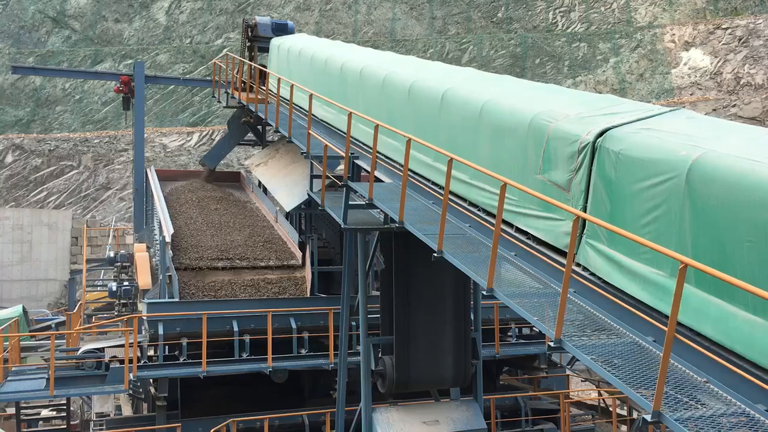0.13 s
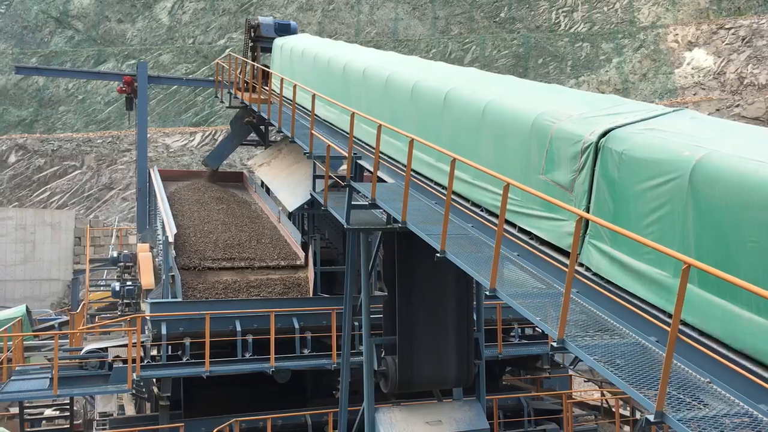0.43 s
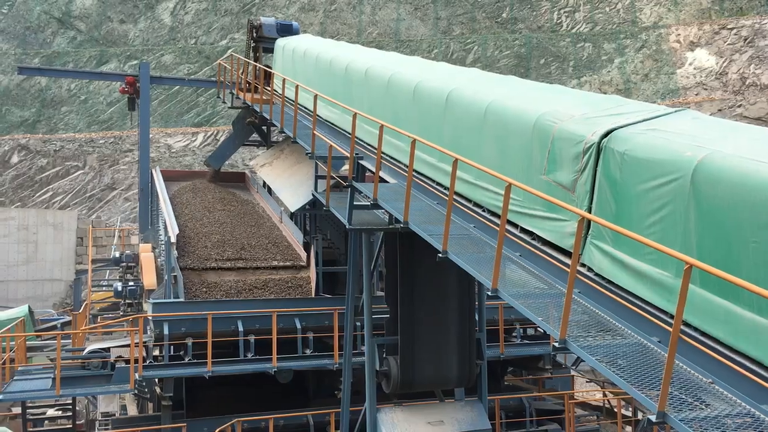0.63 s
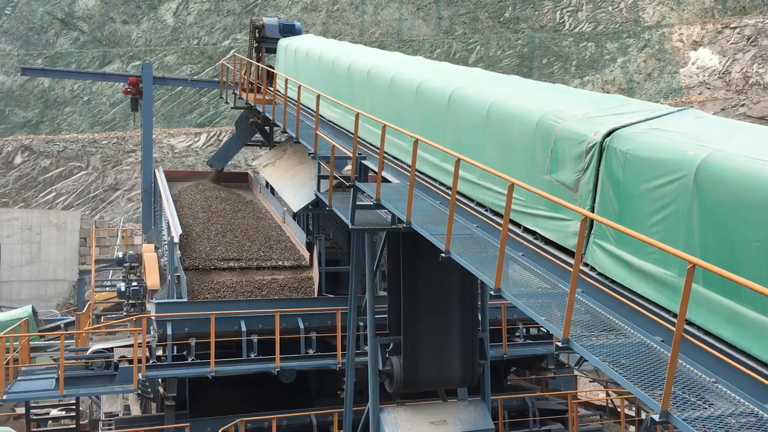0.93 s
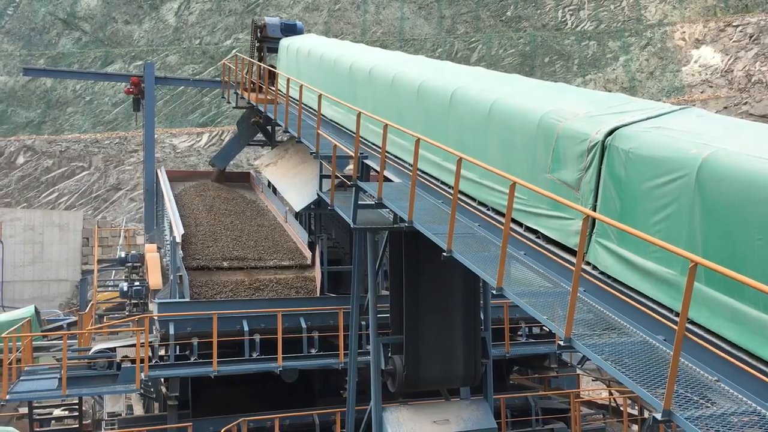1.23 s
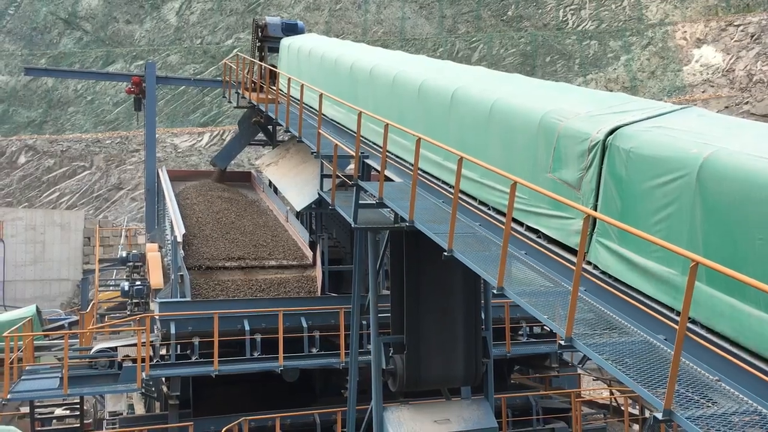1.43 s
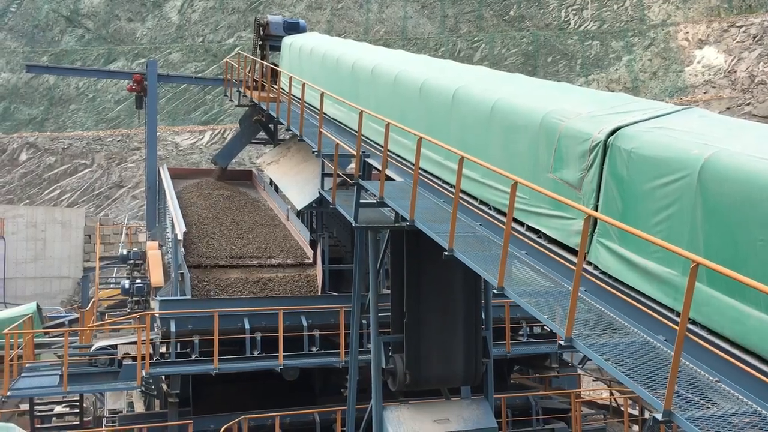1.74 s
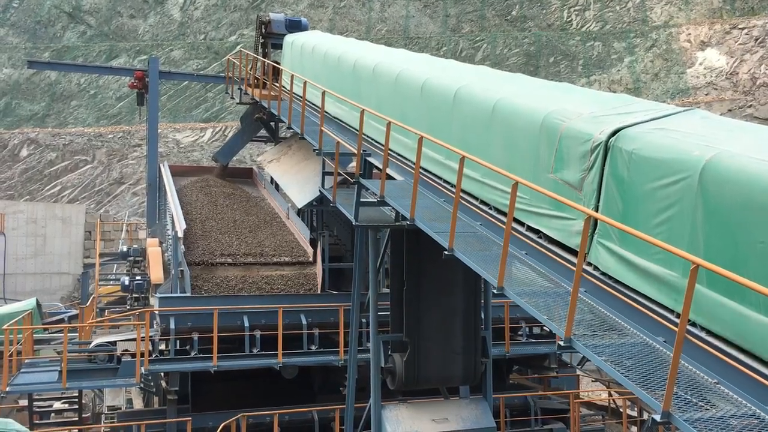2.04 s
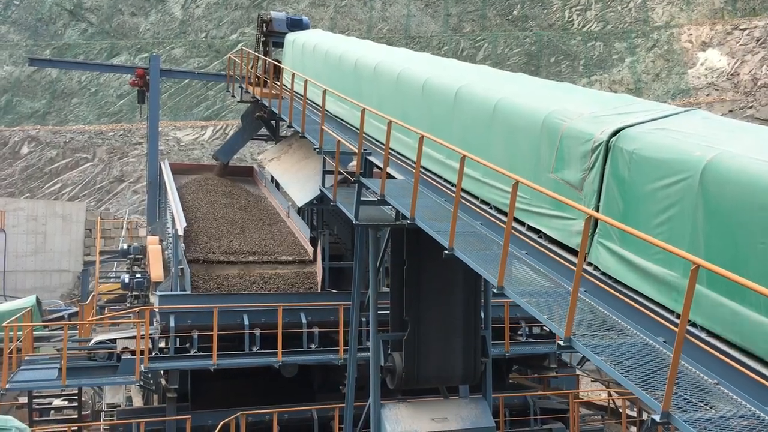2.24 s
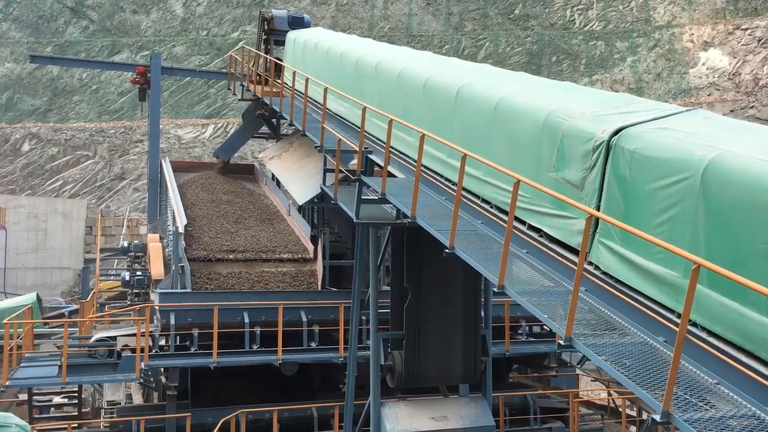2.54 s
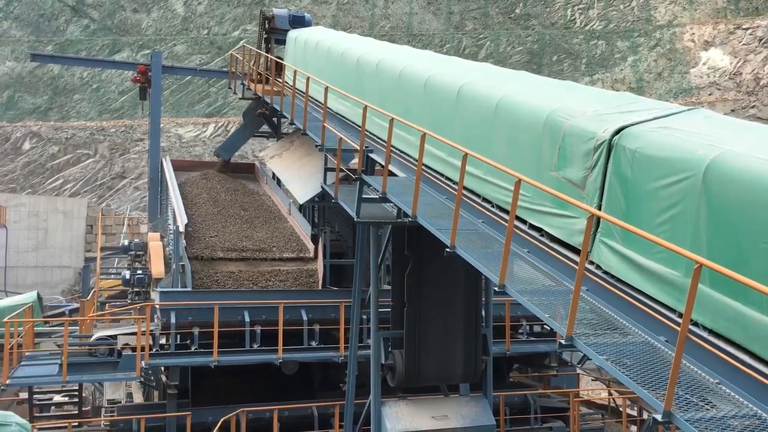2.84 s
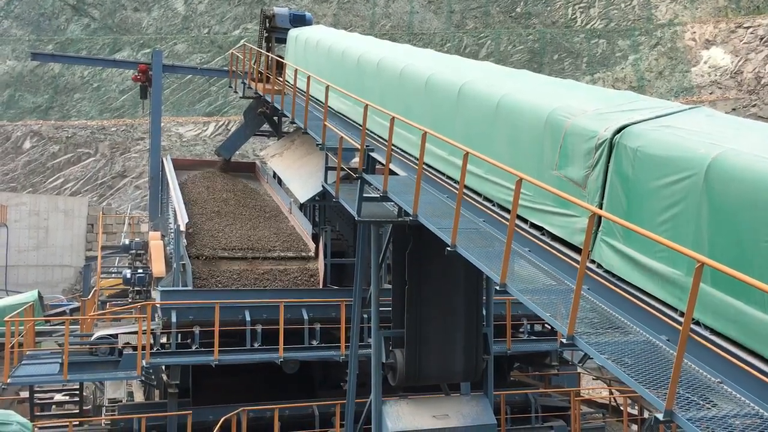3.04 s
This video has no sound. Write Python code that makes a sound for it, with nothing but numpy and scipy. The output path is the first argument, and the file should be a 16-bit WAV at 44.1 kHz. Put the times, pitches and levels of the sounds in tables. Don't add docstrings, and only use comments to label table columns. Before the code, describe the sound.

After 0.08 seconds of silence, a vibrating screen's full roar cuts in and continues to about 3.2 seconds. Gravel lands about fifteen times a second in bright, gritty showers, with tiny wire pings and rolling stones. Pouring rock and ringing steel rumble below, surging unevenly. Lumps thud irregularly, strongest near 0.75 and 1.8; a deep boom comes near 1.9, clanks around 2.05-2.2. Open air, mono phone metres away.

```python
import sys
import numpy as np
from scipy import signal
from scipy.fft import rfft, irfft
from scipy.io import wavfile
from scipy.ndimage import uniform_filter1d

SR = 44100
rng = np.random.default_rng(int(sys.argv[2]) if len(sys.argv) > 2 else 0)


def voltage_ratio(decibels):
    exponent = np.asarray(decibels, float) / 20
    return 10 ** exponent


def bounce(signal):
    frames = np.transpose(np.atleast_2d(signal))
    limited = np.clip(frames, -1, 1)
    pcm = np.round(limited * 32767).astype(np.int16)
    wavfile.write(sys.argv[1], SR, pcm)


N = 141120

SHAFT_HZ = 14.945
LANDING_TURN = 0.19

# (frequency [Hz], density [dB per Hz])
MESH_TONE = [(1200, -21.5), (2500, -3.5), (3200, 2.5), (4700, -4.5), (6200, 0.5), (7800, -9.5),
             (11000, -7.5), (15800, -16)]


def level(x, db):
    return x * voltage_ratio(db) / np.sqrt(np.mean(x ** 2))


def causal(x, db):
    cepstrum = irfft(db * np.log(10) / 20, N)
    cepstrum[1:N // 2] *= 2
    cepstrum[N // 2 + 1:] = 0
    return irfft(rfft(x) * np.exp(rfft(cepstrum)), N)


def colour(x, points):
    point_hz, point_db = np.array(points, float).T
    bin_hz = np.arange(N // 2 + 1) * SR / N
    return causal(x, np.interp(np.log(bin_hz + 1), np.log(point_hz), point_db))


def lowpass(x, hz):
    return signal.sosfilt(signal.butter(2, hz, fs=SR, output="sos"), x)


def ring(x, hz, width):
    return signal.lfilter(*signal.iirpeak(hz, hz / width, fs=SR), x)


def walk(rate):
    hold = int(SR / rate)
    steps = np.repeat(rng.standard_normal(N // hold + 1), hold)
    return 1.27 * uniform_filter1d(uniform_filter1d(steps, hold), hold)[:N]


def clicks(per_s, spread_db):
    hit = rng.random(N) < per_s / SR
    return hit * rng.standard_normal(N) * voltage_ratio(spread_db * rng.exponential(size=N))


def landing(turns):
    sharpness = 1.5
    return np.exp(sharpness * (np.cos(2 * np.pi * (turns - LANDING_TURN)) - 1))


def shower(turns):
    turn_db = 0.5 * rng.standard_normal(64)
    size_db = np.interp(turns - LANDING_TURN, np.arange(64), turn_db)
    stones = clicks(36000 * landing(turns), spread_db=1.0)
    return level(colour(stones * voltage_ratio(size_db), MESH_TONE), -30)


def pings(turns):
    count, low_hz, high_hz = 2500, 1500, 13000
    t60_s, spread_db = 0.03, 10
    t = np.arange(2048) / SR
    out = np.zeros(N + len(t))
    for moment, chance, pitch, softness in rng.random((count, 4)):
        i = int(moment * N)
        if chance < 0.15 + landing(turns[i] + 0.06):
            hz = low_hz * (high_hz / low_hz) ** pitch
            decay = voltage_ratio(-60 * t / t60_s - spread_db * softness)
            out[i:i + len(t)] += np.sqrt(hz) * np.sin(2 * np.pi * hz * t) * decay
    return level(colour(out[:N], MESH_TONE), -37)


def roll():
    # (frequency [Hz], density [dB per Hz])
    roll_tone = [(1200, -11), (2300, -4), (3200, 0), (4700, -3.5), (6200, -2), (7800, -8), (11000, -9),
                 (15800, -16.5)]
    knock = colour(clicks(36000, spread_db=0.7), roll_tone)
    low = lowpass(knock, 5000)
    low_flicker = voltage_ratio(0.23 * walk(7) + 0.49 * walk(42))
    high_flicker = voltage_ratio(0.3 * walk(8.8) + 0.35 * walk(38.8))
    return level(low * low_flicker + (knock - low) * high_flicker, -26.5)


def feed():
    # (time [s], level [dB])
    surges = [(0.1, -22.5), (0.52, -22), (0.71, -24), (0.76, -22.5), (0.81, -22), (1.3, -21.5),
              (1.32, -25.5), (1.49, -17.5), (1.53, -27), (1.66, -24), (1.68, -18.5), (2.39, -22),
              (2.43, -27), (2.49, -23.5), (2.82, -20.5), (2.97, -17), (3.12, -26), (3.15, -20)]
    smooth_s = 0.013
    db = np.interp(np.arange(N) / SR, *np.array(surges).T)
    db = uniform_filter1d(db, int(smooth_s * SR))
    return voltage_ratio(db - db.mean())


def pour():
    # (frequency [Hz], density [dB per Hz])
    roar_tone = [(25, -13), (48, -3.5), (120, -5), (210, -3), (500, -9.5), (1300, -10.5), (2400, -15.5),
                 (6000, -40.5)]
    roar = colour(clicks(15000, spread_db=1.5), roar_tone)
    bass = lowpass(roar, 450)
    surge = feed()
    middle = (roar - bass) * surge ** 0.2 * voltage_ratio(0.79 * walk(11.27))
    return level(bass * surge + middle, -20.5)


def deck(turns):
    # (frequency [Hz], width [Hz], level [dB])
    deck_modes = [(48.5, 6.8, 3), (99, 6.9, -1), (149, 24, -11.5), (165.8, 10.6, 3), (180.7, 7.9, -8.5),
                  (208.6, 10.3, -0.5), (230, 40, -5), (266, 6.2, -4.5), (376, 19, -9), (420, 26, -18.5),
                  (682.6, 80, -9), (898, 15, -5), (1242, 49, -7), (2390, 41, -13.5)]
    kick = voltage_ratio(1.5 * np.cos(4 * np.pi * (turns - 0.19)))
    surge = feed()
    steel = np.zeros(N)
    for hz, width, db in deck_modes:
        impacts = rng.standard_normal(N) * kick * voltage_ratio(1.5 * walk(8))
        mode = level(ring(impacts, hz, width), 0)
        steel += voltage_ratio(db) * np.sqrt(width) * surge ** min(250 / hz, 1) * mode
    return level(steel, -25)


def strike(hits, gain_db, push_s, longer):
    # (ratio to the main ring, level [dB], t60 [s])
    box_modes = [(.45, -19, 0.31), (.8, -10.5, 0.16), (0.998, 1.5, 0.22), (1.3, -12, 0.054),
                 (2.1, -12, 0.16)]
    t = np.arange(SR // 2) / SR
    out = np.zeros(N + len(t))
    spots = rng.standard_normal((len(hits), len(box_modes), 2))
    for (start_s, peak_db, main_hz), spot in zip(hits, spots):
        thud = np.zeros(len(t))
        for (ratio, db, t60), (louder, sharper) in zip(box_modes, spot):
            hz = main_hz * ratio * (1 + 0.0037 * sharper)
            thud += voltage_ratio(db + 2 * louder) * np.sin(2 * np.pi * hz * t) * voltage_ratio(-60 * t / t60 / longer)
        thud *= 1 - np.exp(-t / push_s)
        i = int(start_s * SR)
        out[i:i + len(t)] += thud / np.abs(thud).max() * voltage_ratio(peak_db + gain_db)
    return out[:N]


def lumps():
    # (time [s], peak level [dB], main ring [Hz])
    lump_hits = [(0.149, -22, 165), (0.459, -13, 233), (0.55, -9, 197), (0.66, -10.5, 272),
                 (0.745, -4.5, 211), (1.044, -21, 226), (1.168, -9, 152), (1.38, -9, 170.4),
                 (1.465, -9, 165), (1.677, -15, 183), (1.777, -6.5, 203), (2.258, -14.5, 151),
                 (2.321, -19, 171), (2.476, -13, 213), (2.551, -30, 170), (2.615, -17, 188),
                 (2.713, -9, 174), (2.879, -18, 157), (2.953, -11, 183), (3.007, -14, 205)]
    return strike(lump_hits, gain_db=-7, push_s=0.0016, longer=1)


def booms():
    # (time [s], peak level [dB], main ring [Hz])
    boom_hits = [
        (0.169, -17, 91.5),
        (0.419, -17, 70.0),
        (1.014, -19, 63),
        (1.261, -23, 80),
        (1.76, -19, 59.2),
        (1.899, -15, 46),
        (2.327, -16.5, 60),
        (2.858, -26, 53.4),
        (2.94, -19, 113),
    ]
    return strike(boom_hits, gain_db=-3.5, push_s=0.015, longer=1.7)


def clanks():
    # (time [s], peak level [dB], main ring [Hz])
    clank_hits = [(0.466, -16.5, 927), (0.601, -14, 897), (1.0, -15, 897), (1.084, -23, 1044),
                  (1.379, -25, 852), (1.45, -19, 880), (1.563, -19.5, 1077), (1.63, -21, 784),
                  (1.854, -12, 1080), (2.056, -9.5, 664), (2.165, -12.5, 682), (2.607, -20, 1234),
                  (2.887, -21, 727), (2.976, -13, 1230), (3.066, -18, 625), (3.162, -18, 904)]
    return strike(clank_hits, gain_db=-6.5, push_s=0.0026, longer=0.98)


def scene():
    # (time [s], level [dB])
    screen_load = [
        (0.1, -19),
        (0.22, -18.5),
        (0.23, -20),
        (3.2, -19),
    ]
    t = np.arange(N) / SR
    turns = SHAFT_HZ * t
    load_db = np.interp(t, *np.array(screen_load).T)
    noise = shower(turns) + pings(turns) + roll() + pour() + deck(turns)
    mono = noise * voltage_ratio(0.5 * (load_db - load_db.mean()))
    mono = mono + lumps() + booms() + clanks()
    return np.array([mono, mono])


def top_cut(x):
    return signal.sosfilt(signal.butter(12, 16950, fs=SR, output="sos"), x)


def record(dry):
    # (frequency [Hz], width [Hz], level [dB])
    case_modes = [(1940, 290, 1.5), (2913, 504, -5.5), (3176, 370, 3), (4870, 230, -1.5), (6800, 340, 1),
                  (9700, 1000, 3.5), (10320, 340, -5.5), (10940, 600, 2)]
    clip, top_hz = 0.69, 15760
    start_s, fade_s = 0.0836, 0.001
    bin_hz = np.arange(N // 2 + 1) * SR / N
    case_db = sum(db / (1 + (2 * (bin_hz - hz) / width) ** 2) for hz, width, db in case_modes)
    x = causal(dry[0], case_db)
    x = signal.sosfilt(signal.butter(3, 44, "high", fs=SR, output="sos"), x)
    x = clip * np.tanh(x / clip)
    x = signal.sosfilt(signal.ellip(12, 0.2, 60, top_hz, fs=SR, output="sos"), x)
    x = x * np.clip((np.arange(N) / SR - start_s) / fade_s, 0, 1)
    return top_cut(np.array([x, x]))


dry = scene()
out = record(dry)
bounce(out)
```